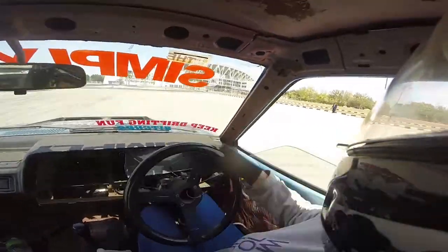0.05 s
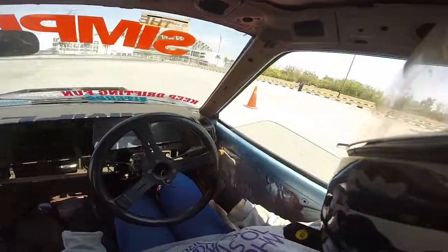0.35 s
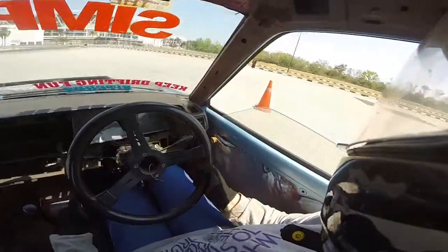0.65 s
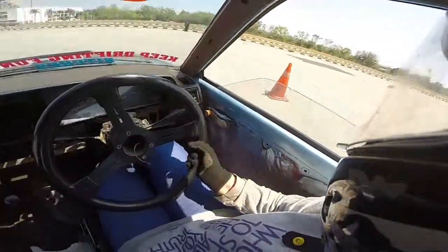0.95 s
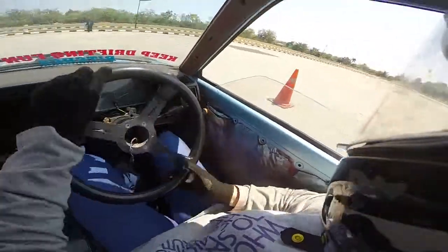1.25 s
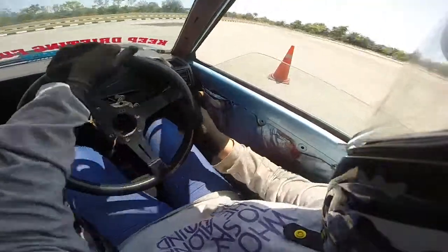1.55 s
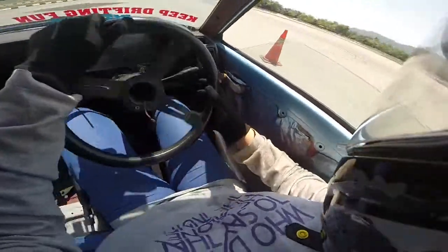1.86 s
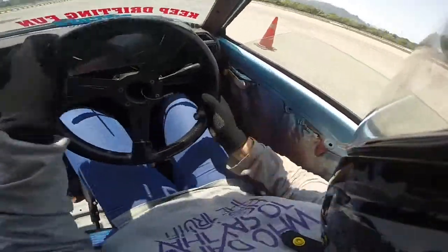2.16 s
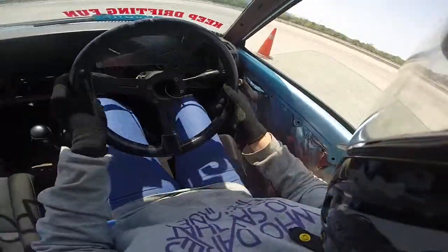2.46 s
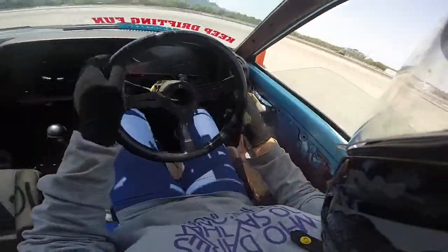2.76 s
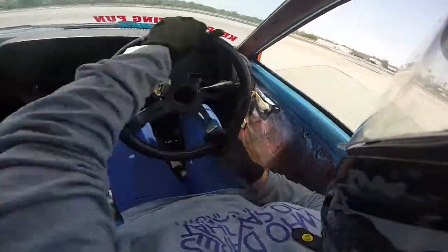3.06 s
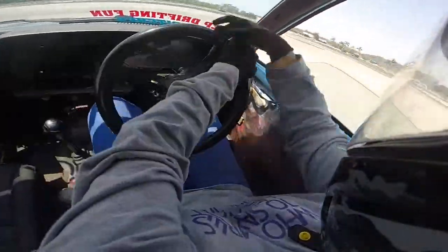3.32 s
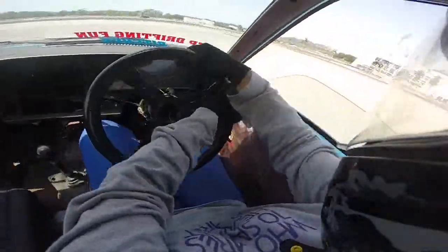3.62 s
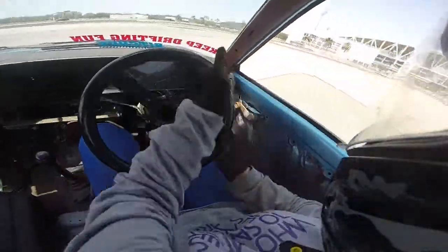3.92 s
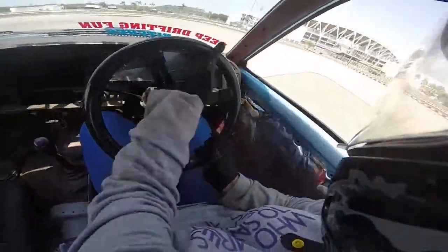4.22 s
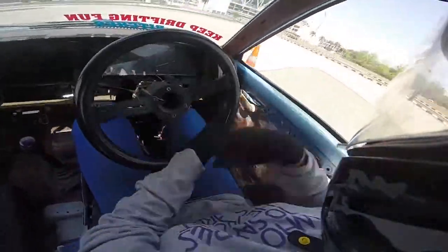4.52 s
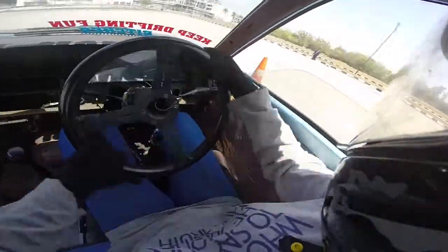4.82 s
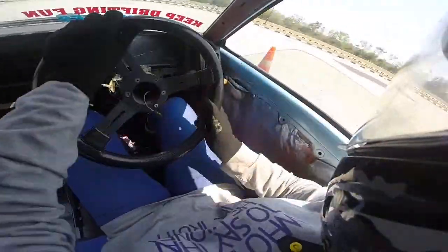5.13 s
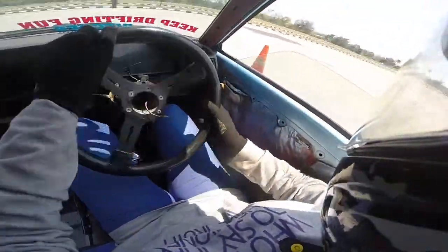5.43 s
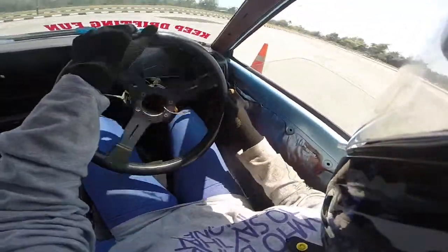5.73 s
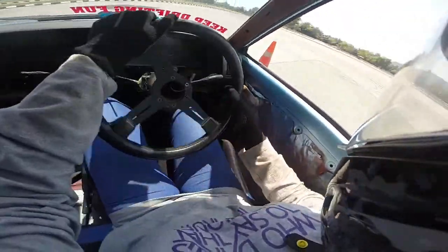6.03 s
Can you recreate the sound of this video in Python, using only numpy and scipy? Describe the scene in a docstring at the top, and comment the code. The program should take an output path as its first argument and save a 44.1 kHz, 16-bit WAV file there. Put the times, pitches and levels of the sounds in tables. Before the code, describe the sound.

A four-cylinder car engine booms from inside a bare cabin while the car drifts. It opens with a quick rev, a gust on the microphone and a heavy thump, then coasts briefly. The throttle is then pumped again and again, the raspy drone swelling and dipping, with dull sputters at each lift. Tyres scrub and faintly squeal on concrete, and loose fittings rattle.

```python
"""Drifting round cones, heard from inside the car

A stripped four-cylinder car slides with its window open, the throttle pumped about twice a second.
The exhaust booms at the rate the cylinders fire, and sputters and pops with the throttle shut.
Valves rasp and the air intake hisses under load. The tyres scrub and sing faintly, loose fittings
rattle and squeak, the body thumps, and a gust through the window buffets the microphone."""
import sys
import numpy as np
from scipy import signal
from scipy.fft import rfft, irfft, next_fast_len
from scipy.io import wavfile
from scipy.ndimage import uniform_filter1d, map_coordinates

SR = 44100
rng = np.random.default_rng(int(sys.argv[2]) if len(sys.argv) > 2 else 0)


def wav_out(sig):
    """Save sig, one row per channel (or a flat mono array), as 16-bit PCM at SR to the path in sys.argv[1]."""
    wavfile.write(sys.argv[1], SR, np.round(np.clip(np.atleast_2d(sig).T, -1, 1) * 32767).astype(np.int16))


N = 276948
TIME = np.arange(N) / SR

# spells of ragged burning and exhaust dips with the throttle shut:
# start_s, end_s, raggedness (0-1), exhaust_drop_db
SPUTTERS = [(0, 0.067, 0, -5), (.24, 0.497, 0.31, -1), (1.025, 1.25, 0.27, -5), (1.816, 2.004, 0.23, -4),
            (2.612, 2.694, 0.29, -2), (3.188, 3.387, 0.59, -10.5), (3.852, 4.03, 0.32, -7.5),
            (4.452, 4.538, 0.34, -9), (5.114, 5.189, 0.37, -5), (5.565, 5.792, 0.38, -5.5),
            (6.235, 6.268, 0.7, -9)]
# pitches at which the bare steel panels ring: pitch_hz, width_hz, boost_db
PANEL_RINGS = [(940, 81, 3.5), (1245, 74, 4), (1542, 47, 5.5), (2230, 53, 2), (2318, 295, -7.5),
               (2596, 276, 5.5), (3420, 72, -6), (3833, 204, 6.5), (4566, 91, 8.5), (5200, 530, -6.5),
               (5720, 710, 6), (10900, 370, 5.5), (11800, 810, 1)]


def undb(db):
    """Turn decibels into a number to multiply by."""
    return 10 ** (np.asarray(db) / 20)


def unit(x):
    """Scale a sound to an average strength (rms) of 1."""
    return x / np.sqrt(np.mean(x ** 2))


def wander(rate):
    """A smooth random wobble, about 1 in size, that turns rate times a second."""
    hold = int(SR / rate)
    steps = np.repeat(rng.standard_normal(N // hold + 1), hold)
    return 1.288 * uniform_filter1d(steps, hold)[:N]


def per_firing(firings):
    """A fresh random value each time a cylinder fires, joined smoothly."""
    return map_coordinates(rng.standard_normal(2048), [firings], order=3, mode="wrap")


def colour(x, outline, rings=()):
    """Shape a tone with an outline (pitch_hz, level_db) and rings (pitch_hz, width_hz, boost_db)."""
    size = next_fast_len(N + 8192)
    hz = np.maximum(np.fft.rfftfreq(size, 1 / SR), 1)
    outline_hz, outline_db = np.transpose(outline)
    gain_db = np.interp(np.log(hz), np.log(outline_hz), outline_db)
    for pitch_hz, width_hz, boost_db in rings:
        gain_db += boost_db / (1 + (2 * (hz - pitch_hz) / width_hz) ** 2)
    # fold the filter so that it rings after a sound, never before it
    cepstrum = irfft(np.log(undb(gain_db)), size)
    cepstrum[1:size // 2] *= 2
    cepstrum[size // 2 + 1:] = 0
    return irfft(rfft(x, size) * np.exp(rfft(cepstrum)), size)[:N]


def echoes(x, decay_s):
    """Sound bounces between the bare panels, which boosts some pitches and weakens others."""
    age = TIME[:SR // 10]
    return signal.fftconvolve(x, rng.standard_normal(len(age)) * np.exp(-age / decay_s))[:N]


def throttle():
    """How far the pedal is down (0-1), and the four levels that the current press aims for."""
    # pedal presses, with relative levels:
    # start_s, end_s, opening_s, closing_s, boom_db, overtone_db, rasp_db, hiss_db
    presses = [(.085, .255, 0.2, 0.032, -19.5, -34, -17.5, -59),
               (1.204, 1.87, .17, 0.099, -17.5, -27, -25, -54),
               (1.946, 2.654, .16, 0.055, -17.5, -28, -24, -56.5),
               (2.686, 3.243, 0.27, 0.066, -17.5, -30.5, -24, -60),
               (3.38, 3.911, 0.25, 0.083, -17.5, -30, -24, -56),
               (4.05, 4.497, .28, .08, -19, -26, -24, -51.5),
               (4.567, 5.115, 0.17, 0.16, -18, -26.5, -24.5, -53),
               (5.186, 5.623, 0.16, 0.12, -18, -28.5, -25, -57.5),
               (5.763, 6.308, 0.22, .16, -18, -26.5, -25, -55.5)]
    pedal = np.zeros(N)
    targets_db = np.outer(presses[0][4:], np.ones(N))
    for start, end, opening_s, closing_s, *levels_db in presses:
        pedal += np.clip(np.minimum((TIME - start) / opening_s, (end - TIME) / closing_s), 0, 1)
        targets_db[:, TIME >= start] = np.array(levels_db)[:, None]
    return np.clip(pedal, 0, 1), targets_db


def blend(shut_db, open_db, share):
    """A level between its values for a shut and an open throttle."""
    return shut_db + (open_db - shut_db) * share


def raggedness():
    """How unevenly the engine burns: zero except during a sputter."""
    ragged = sum(amount * ((TIME > start) & (TIME < end)) for start, end, amount, _ in SPUTTERS)
    return uniform_filter1d(ragged, SR // 50)


def sag(drop_s=0.0049, recover_s=0.064):
    """The exhaust level, in dB, drops at each sputter, sinks further and then recovers."""
    return sum(np.interp(TIME, [start, start + drop_s, end, end + recover_s], [0, 0.43 * db, db, 0])
               for start, end, _, db in SPUTTERS)


def exhaust(firings, boom_db, overtone_db):
    """Pressure waves leave the pipe; in a sputter the burns differ in strength and timing."""
    # the silencer passes the boom and damps what lies above it: pitch_hz, level_db
    silencer = [(40, 10.5), (90, -3), (150, 1.5), (205, 4.5), (245, -19.5), (350, -11.5), (800, -46)]
    # the pitch at which the pipe booms most: pitch_hz, width_hz, boost_db
    pipe_boom = [(170.4, 11.3, 3.5)]
    # tones above the boom: multiple of the firing rate, relative_db
    overtone_levels = [(1.25, -2.5), (1.5, 0.5), (1.75, -6), (2, 6.5), (2.252, -36), (2.5, -35),
                       (2.75, -15.5), (3, -2.5), (3.25, -17), (3.5, -29), (4, -9), (4.5, -27), (5, -14.5),
                       (5.499, -23), (6.001, -18)]
    # the cabin air favours some pitches as the overtones glide through: pitch_hz, level_db
    cabin_air = [(200, 5.5), (260, -12.5), (300, -3), (345, 1.5), (390, -4), (425, -7.5), (490, 5),
                 (550, 0.5), (608, 10), (680, -18), (790, -8), (880, -10), (1050, 3)]
    ragged = raggedness()
    angle = 2 * np.pi * firings + ragged * per_firing(firings)
    imbalance = 0.054 * np.sin(np.pi * firings / 2)  # the four cylinders never fire quite alike
    strength = 1 + imbalance + (0.11 + 0.75 * ragged) * per_firing(firings)
    boom = colour(np.sqrt(2) * strength * np.sin(angle), silencer, pipe_boom)
    overtones = np.zeros(N)
    for multiple, db in overtone_levels:
        size = undb(db + 2.4 * wander(8)) * (1 + 0.19 * per_firing(firings))
        overtones += size * np.sin(multiple * angle + rng.uniform(0, 2 * np.pi))
    # weak burns while coasting give unsteady overtones
    weak = np.clip((-32 - overtone_db) / 8, 0, 1)
    overtones *= 1 - 0.5 * weak + 1.6 * weak * per_firing(firings)
    return boom * undb(boom_db) + unit(colour(overtones, cabin_air)) * undb(overtone_db + 0.5)


def rasp(firings, load_db, tone_count=200, odd_db=-5, gas_db=-9):
    """Valves and pistons clatter in a pattern four firings long; gas rushes with each firing."""
    # what gets through the wall between engine and cabin: pitch_hz, level_db
    engine_wall = [(200, -7), (400, -13), (600, -13.5), (750, -4.5), (920, -1.5), (1100, -5), (1250, 2.5),
                   (1600, 2.5), (1900, 2), (2350, 0), (2700, -7), (3300, -13.5), (6000, -21),
                   (15000, -37.5)]
    multiples = np.arange(tone_count)
    # two pairs of cylinders take turns, so the even multiples stand out
    weights = undb(odd_db * (multiples % 2)) * (multiples > 0)
    pattern = irfft(weights * np.exp(2j * np.pi * rng.random(tone_count)), 4096)
    cycles = (firings + 0.006 * per_firing(firings)) / 4
    clatter = np.interp(cycles, np.arange(len(pattern)) / len(pattern), pattern, period=1)
    throb = 1 + 0.4 * np.cos(2 * np.pi * firings) + 0.21 * per_firing(firings)
    sound = throb * (unit(clatter) + undb(gas_db) * rng.standard_normal(N))
    sound = echoes(sound, decay_s=0.023)  # makes each tone swell and fade as it glides
    return unit(colour(sound, engine_wall, PANEL_RINGS)) * undb(load_db - 1)


def intake(hiss_db):
    """Air drawn hard into the engine makes a thin hiss."""
    # pitch_hz, level_db
    hiss_tone = [(3000, -4), (7000, -6), (10500, 2.5), (11800, -5.5), (13000, 2.5), (15000, -12.5)]
    return unit(colour(rng.standard_normal(N), hiss_tone)) * undb(hiss_db + 4)


def tyre_scrub(slide, rolling_db=-32.5, slide_boost_db=3):
    """Tyres scrubbing over concrete shake the body, more so in a slide."""
    # the rumble of the rolling car: pitch_hz, level_db
    road_tone = [(18, -9), (33, 2.5), (50, 1), (70, -8.5), (120, -12), (250, -12), (600, -21),
                 (1100, -13.5), (1800, -21), (2800, -15.5), (4000, -26.5), (7500, -35.5), (11000, -50),
                 (15000, -80)]
    scrub = rng.standard_normal(N) * undb(1.25 * wander(18))
    return unit(colour(scrub, road_tone, PANEL_RINGS)) * undb(rolling_db + slide_boost_db * slide)


def knock_force(knocks, gain_db=-10.5, rise_s=0.0013, lead_s=0.0014, fade_s=0.092):
    """Each knock (time_s, relative_db) gives a quick push that falls 60 dB in fade_s."""
    taps, age = np.zeros(N), TIME[:SR // 2]
    for time_s, db in knocks:
        if time_s < TIME[-1]:
            taps[int(max(time_s - lead_s, 0) * SR)] += undb(db + gain_db)
    shape = (1 - np.exp(-age / rise_s)) * undb(-60 * age / fade_s)
    return signal.fftconvolve(taps, shape)[:N]


def rattles(slide, chatter_db=-55, slide_boost_db=8):
    """Loose metal clatters at each knock and chatters in between; small parts tick in the slide."""
    # the loudest knocks: time_s, relative_db
    knocks = [(.025, -27), (0.091, -11), (.21, -19), (1.0656, -18), (1.0944, -26), (1.206, -17.5),
              (1.2887, -18), (1.335, -10.5), (1.3514, -25), (1.487, -19), (2.1329, -23), (2.4565, -17),
              (2.4995, -21), (2.5968, -17), (3.895, -21.5), (3.9426, -20), (4.129, -20.5), (4.6879, -21),
              (5.1435, -22), (5.4986, -23), (5.5425, -21), (5.628, -17.5), (6.003, -16), (6.2001, -20),
              (6.2397, -21)]
    # the tone of the loose fittings: pitch_hz, level_db
    fitting_tone = [(800, -26), (2500, 6), (4000, 2.5), (6500, 1.5), (9000, -5.5), (11000, -19.5),
                    (15000, -23)]
    # the tone of the small parts: pitch_hz, level_db
    tick_tone = [(800, -32), (3500, 4), (6500, 1), (9000, -5), (11000, -28), (15000, -32)]
    contacts = echoes(rng.standard_normal(N), decay_s=0.0055) * undb(0.4 * wander(600))
    chatter = undb(chatter_db + slide_boost_db * slide + 5 * wander(70))
    fittings = (chatter + knock_force(knocks)) * unit(colour(contacts, fitting_tone, PANEL_RINGS))
    ticks = slide * knock_force(light_knocks()) * unit(colour(contacts, tick_tone))
    return fittings + ticks


def light_knocks(start_s=2.1, typical_gap_s=1 / 11, count=60):
    """Small parts knock by chance, at uneven gaps: rows of time_s, relative_db."""
    gap, size = rng.standard_normal((count, 2)).T
    times = start_s + np.cumsum(typical_gap_s * np.exp(0.5 * gap))
    return list(zip(times, -27.5 + 5 * size))


def gust(hiss_db=-32):
    """Swirls of air press on the microphone and hiss; each puff swells and dies away."""
    # puffs of wind: peak_s, level_db, rise_s, decay_s
    puffs = [(.11, -15.5, 0.065, 0.057), (.25, -12, 0.029, 0.058)]
    # pitch_hz, level_db
    wind_tone = [(10, -32), (24, -4), (35, 7), (55, -11), (100, -18), (200, -17), (600, -74), (3000, -96)]
    swirls = unit(colour(rng.standard_normal(N), wind_tone))
    force = sum(undb(db) * np.exp(-np.maximum((peak_s - TIME) / rise_s, (TIME - peak_s) / decay_s))
                for peak_s, db, rise_s, decay_s in puffs)
    return (unit(np.tanh(swirls)) + undb(hiss_db) * rng.standard_normal(N)) * force


def friction_tones(tones, waver, wavers_per_s):
    """Surfaces that grip and slip in quick turns sing tones that swell, glide and waver."""
    sound = np.zeros(N)
    for start, end, from_hz, to_hz, db in tones:
        progress = np.clip((TIME - start) / (end - start), 0, 1)
        hz = (from_hz + (to_hz - from_hz) * progress) * (1 + waver * wander(wavers_per_s))
        swell = 2 * np.sqrt(progress * (1 - progress))
        sound += undb(db + 1.2 * wander(81)) * swell * np.sin(2 * np.pi * np.cumsum(hz) / SR)
    return np.sqrt(2) * sound


def tyre_squeals():
    """Sliding rubber sings faintly on the concrete."""
    # squeals: start_s, end_s, from_hz, to_hz, level_db
    squeals = [(.105, .24, 1536, 1550, -33), (1.35, 1.85, 1530, 1570, -32.5),
               (2.02, 2.32, 1218, 1276, -32.5), (2.02, 2.6, 1545, 1520, -35), (2.42, 2.66, 1210, 1228, -36),
               (3.5, 3.85, 1231, 1255, -39), (5.3, 5.58, 1228, 1257, -34), (6.0, 6.28, 1214, 1270, -39)]
    return friction_tones(squeals, waver=0.00693, wavers_per_s=91)


def body_jolts(rise_s=0.0032):
    """The car's body thumps and rings low when the engine stops pulling."""
    # thumps: start_s, pitch_hz, fade_s (time to fall 60 dB), level_db
    thumps = [(0.23, 34.5, 0.24, -5), (.24, 75, .12, -4.5), (1.939, 105, 0.14, -24),
              (2.62, 110, 0.087, -12.5), (3.246, 94.96, 0.11, -14), (3.874, 100.1, .12, -13),
              (5.614, 84.96, 0.11, -16.5)]
    sound = np.zeros(N)
    for start, hz, fade_s, db in thumps:
        age = np.maximum(TIME - start, 0)
        shape = (1 - np.exp(-age / rise_s)) * undb(db - 60 * age / fade_s)
        sound += shape * np.sin(2 * np.pi * hz * age)
    return sound


def exhaust_pops(firings, gain_db=-19, spread_db=4.5):
    """Unburnt fuel pops in the pipe during the ragged spells, one pop of random size per firing."""
    # the dull tone of a pop: pitch_hz, level_db
    pop_tone = [(40, -25.5), (90, -7.5), (140, 5), (215, 0.5), (290, -10.5), (420, -25), (900, -47),
                (3000, -90)]
    fired = np.flatnonzero(np.diff(np.floor(firings)))
    direction, size = rng.standard_normal((2048, 2))[:len(fired)].T
    pulses = np.zeros(N)
    pulses[fired] = np.sign(direction) * undb(spread_db * np.clip(size, -2, 2))
    return unit(colour(pulses, pop_tone)) * raggedness() * undb(gain_db)


def fitting_squeaks():
    """Loose fittings rub and give short, high squeaks."""
    # squeaks: start_s, end_s, from_hz, to_hz, level_db
    squeaks = [(1.155, 1.2, 3950, 4000, -38), (1.185, 1.215, 4500, 4600, -35.5)]
    return friction_tones(squeaks, waver=0.005, wavers_per_s=850)


def scene(flywheel_s=0.0872):
    """Speed and throttle drive the engine sounds; tyres, body and wind join them in the cabin."""
    # engine speed at its turning points: time_s, firing_rate_hz
    engine_speed = [(.03, 179.5), (.2, 203.5), (1, 156.8), (1.33, 145.4), (1.55, 157.2), (1.79, 179.8),
                    (2.02, 166.1), (2.3, 188.1), (2.54, 205.4), (2.77, 191.6), (3.16, 204.6), (3.32, 167.8),
                    (3.56, 170.8), (3.84, 187.6), (4.05, 159), (4.44, 170.2), (4.66, 156), (5, 177.2),
                    (5.27, 166.8), (5.56, 187.7), (5.82, 159.2), (6.22, 180.2), (6.28, 175)]
    # how hard the car slides sideways: time_s, amount (0-1)
    slide_amounts = [(1.9, 0.3), (2.6, 1), (3.45, 0.88), (4.05, 0.16), (5.2, 0.37), (6.28, 0.56)]
    firing_hz = np.interp(TIME, *np.transpose(engine_speed))
    # the heavy flywheel smooths each change of speed
    firing_hz = uniform_filter1d(firing_hz, int(flywheel_s * SR), mode="nearest")
    firings = np.cumsum(firing_hz * (1 + 0.001028 * wander(30))) / SR  # running count
    pedal, (open_boom_db, open_overtone_db, open_rasp_db, open_hiss_db) = throttle()
    sag_db = sag()
    # the boom answers the first touch of the pedal, the hiss only a wide throttle
    boom_db = blend(-22, open_boom_db, pedal ** 0.4) + sag_db
    overtone_db = blend(-36.5, open_overtone_db, pedal ** 0.4) + 0.6 * sag_db
    hiss_db = blend(-70.5, open_hiss_db, pedal ** 1.14)
    coast_rasp_db = -38.5 + 0.238 * (firing_hz - 162)  # more clatter the faster it spins
    rasp_db = blend(coast_rasp_db, open_rasp_db, pedal ** 0.77)
    engine = exhaust(firings, boom_db, overtone_db) + rasp(firings, rasp_db)
    engine += intake(hiss_db) + exhaust_pops(firings)
    slide = np.interp(TIME, *np.transpose(slide_amounts))
    tyres = tyre_scrub(slide) + tyre_squeals()
    body = body_jolts() + rattles(slide) + fitting_squeaks()
    return (engine + tyres + body + gust())[None]


def record(dry, bass_hz=16, ceiling=0.8, top_hz=14900):
    """The microphone cuts the deepest bass, rounds the loudest peaks and cuts the highest treble."""
    sound = signal.sosfilt(signal.butter(2, bass_hz, "high", fs=SR, output="sos"), dry)
    sound = sound / (1 + (sound / ceiling) ** 10) ** (1 / 10)
    return signal.sosfilt(signal.ellip(8, 0.2, 70, top_hz, fs=SR, output="sos"), sound)


dry = scene()
out = record(dry)
wav_out(out)
```